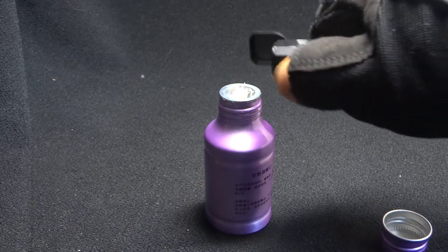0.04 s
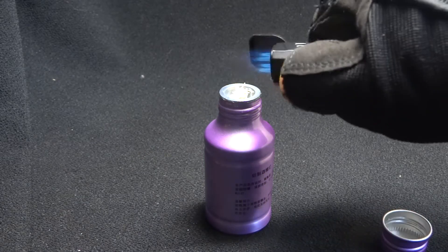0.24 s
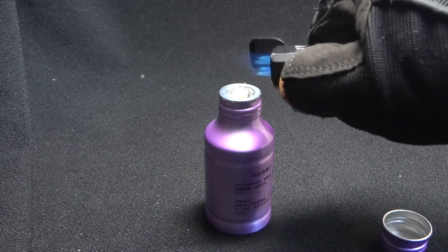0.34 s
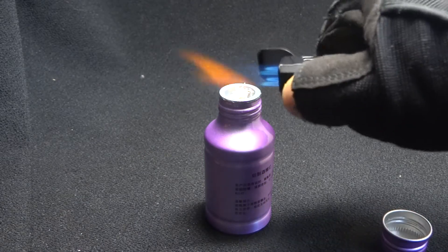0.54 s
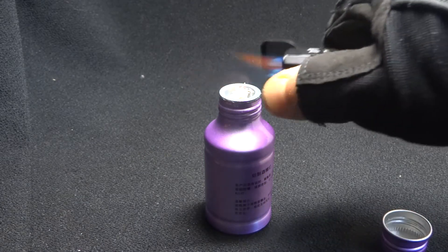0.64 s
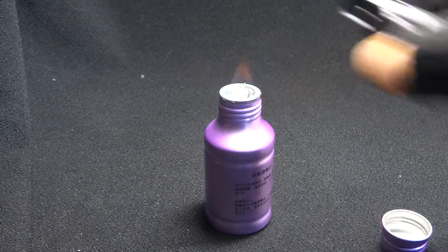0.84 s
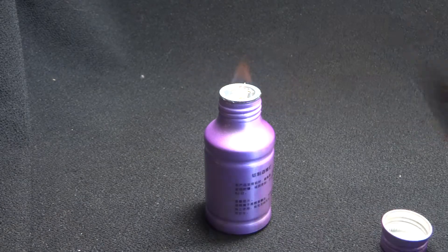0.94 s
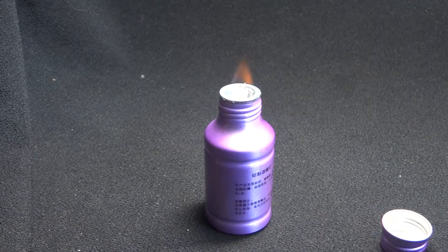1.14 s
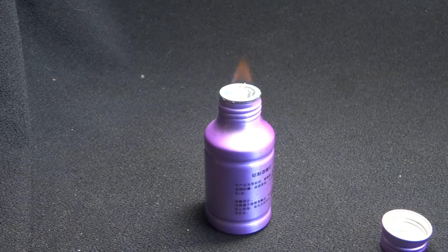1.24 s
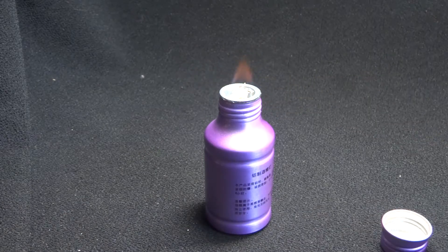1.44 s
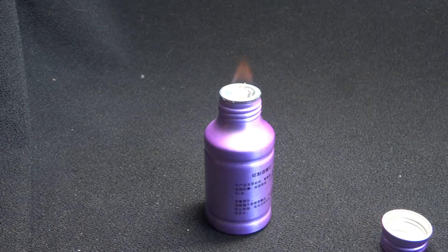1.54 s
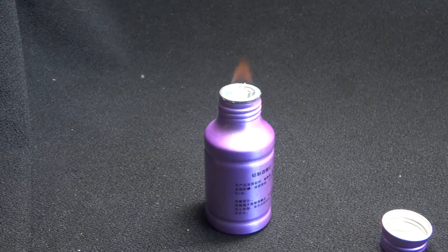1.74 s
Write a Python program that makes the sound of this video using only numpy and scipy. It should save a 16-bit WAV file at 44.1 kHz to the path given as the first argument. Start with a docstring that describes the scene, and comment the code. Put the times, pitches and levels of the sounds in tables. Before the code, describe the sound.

Sharp click and short rush of a jet lighter, followed by a dull knock.

```python
"""A jet lighter lights a spirit lamp on a cloth-covered table in a quiet room.
Gas hisses as the trigger goes down, the igniter's hammer snaps and rings the casing, the flame blows
for 0.4 s and the trigger clicks back. Then something, probably the lighter, is put down: hard contacts
tap, soft pushes ring the table with a dull knock. The hits echo briefly over a low room rumble."""
import sys
import numpy as np
from scipy import signal
from scipy.fft import rfft, irfft
from scipy.io import wavfile

SR = 44100
rng = np.random.default_rng(int(sys.argv[2]) if len(sys.argv) > 2 else 0)


def dump_mix(stems):
    """Bounce the given channels to the path in sys.argv[1] as a 16-bit WAV at rate SR."""
    frames = np.atleast_2d(stems).T  # one column per channel
    limited = np.clip(frames, -1, 1)  # hard clip at full scale
    pcm = np.round(limited * 32767).astype(np.int16)
    wavfile.write(sys.argv[1], SR, pcm)


N = 79380

# Room rumble spectrum (frequency [Hz], level [dB])
RUMBLE_SPECTRUM = [(15, -51.5), (25, -24), (59, 3.5), (141, -4.5), (311, 2.5), (344, 2), (518, -6),
                   (559, -5), (1260, -12.5), (1670, -13), (1900, -15), (4400, -22), (11000, -26),
                   (14300, -59), (22000, -120)]
# Reverb decay (frequency [Hz], T60 [s])
TAIL_T60 = [(100, 0.11), (400, .33), (2000, 0.23), (5000, 0.28), (8000, 0.23), (11000, 0.11)]
# Reverb spectrum (frequency [Hz], gain [dB])
TAIL_SPECTRUM = [(100, -6.5), (500, 0.5), (2000, 1), (5000, -2.5), (8000, -1.5), (11000, -2.5)]
# Early reflections (delay [s], gain [dB])
REFLECTIONS = [(.0042, -16.5), (.0078, -14.5), (.0095, -32), (0.016, -33.5)]

# Blows of hand and lighter (time [s], level [dB], push width [s], deep mode gain [dB])
PUSHES = [(0.2058, -35.5, 0.00042, -0.5), (0.2075, -37.5, 0.0021, 10), (0.247, -48, .0008, -22),
          (0.5419, -40, 0.00052, -36), (0.5447, -37.5, 0.0006, -42.5), (1.2837, -37, .0005, -4),
          (1.2923, -29, 0.0021, -7), (1.2995, -23, 0.00091, -1.5), (1.3025, -25.5, 0.00033, -3),
          (1.3325, -39, 0.0016, -15)]
# Table modes (frequency [Hz])
TABLE_MODES_HZ = [237, 287, 340, 408, 460, 510, 607, 730]
# Ring per table mode (level [dB], T60 [s])
TABLE_DECAYS = [(-16.5, .22), (-30.5, .12), (-24, .14), (-18, 0.12), (-15.5, .09), (-18.5, .14), (-30, 0.3),
                (-27.5, 0.16)]
# Low modes of table and room (frequency [Hz], level [dB], T60 [s])
DEEP_MODES = [(50, -29, .3), (99.4, -23, 0.41), (143, -12.5, 0.57)]
# Thump filter (frequency [Hz], gain [dB])
THUMP_SPECTRUM = [(25, -31), (50, -5), (110, 1), (400, 4.5), (1000, -4)]
# Put-down contacts (time [s], levels at 600 Hz, 1.2 kHz, 2 kHz, 8 kHz [dB], decay [s])
CONTACTS = [(1.2399, -2.5, -3, -16, -22.5, 0.0084), (1.2837, -1.5, -15.5, -30.5, -44, 0.0039),
            (1.2911, 7.5, -12.5, -2, -10, 0.0048), (1.332, -7.5, -30, -26.5, -33.5, 0.0024),
            (1.3444, -12, -31.5, -22.5, -34, 0.0096)]
# Tap low end (frequency [Hz], level re 600 Hz [dB])
TAP_LOW_END = [(30, -42), (150, -2.5), (330, -1.5)]
# Woody ring of a tap (frequency [Hz], level [dB], T60 [s])
WOOD_MODES = [(710, -9, .025), (1116, -8, 0.039), (1380, -8, 0.025), (2082, -0.5, 0.018), (3054, -1, 0.01),
              (3945, 1.5, 0.028), (4380, -6, 0.022), (5730, 0, 0.014), (7500, 8, 0.016)]

# Trigger and casing clicks
# (time [s], levels at 2, 4, 9 kHz [dB], decay [s], struck part pitch [Hz], part level [dB])
CLICK_EVENTS = [(.0385, -33, -31, -40.5, 0.004, 3460, -1), (.0848, -5.5, -9.5, -8.5, 0.0015, 2618, -27),
                (.1208, -16, -34, -27.5, .002, 3540, 1), (.4338, -23.5, -19.5, -24.5, 0.0043, 3630, -2),
                (.5946, -6, -13.5, -2.5, 0.0039, 3720, 2), (.6178, -24, -30, -21, 0.0033, 4970, 0),
                (.637, -32, -34, -39, 0.0019, 4900, -10), (.7195, -26.5, -47, -57, .002, 2390, -6),
                (1.016, -38.5, -30.5, -40.5, 0.0039, 4703, -13.5), (1.037, -37, -41, -43, .003, 3930, -2)]
# Click low end (frequency [Hz], level re 2 kHz [dB])
CLICK_LOW_END = [(60, -16.5), (350, -13.5), (800, -22.5), (1350, -18)]
# Trigger ring (frequency [Hz], level [dB], T60 [s])
TRIGGER_MODES = [(1890, -11, .025), (2140, -5, .03), (2300, -3, .025), (2700, -2, .012), (3330, -1, .016),
                 (3850, 1, .016), (4930, -2, .016), (6250, 1, .014), (7450, -4, .016), (8760, -3, .016),
                 (9230, -3, .018), (10150, -2, .016)]
# Hammer impact spectrum (frequency [Hz], gain [dB])
SNAP_SPECTRUM = [(60, -36.5), (250, -30.5), (450, -19.5), (850, -32.5), (1400, -18), (1850, -0.5),
                 (2350, 0), (2900, -12.5), (3700, 1), (4800, -6.5), (5600, -4.5), (8000, 1.5), (9000, -3),
                 (9700, -2), (11000, -7.5)]
# Casing ring (frequency [Hz], level [dB], T60 [s])
CASING_MODES = [(1915, -1, .035), (2140, -1, .04), (2290, 1, .03), (2600, -9, .012), (3300, -9, .015),
                (3615, -3, .022), (3880, -4, .022), (4400, -8, .012), (5460, -5, .02), (5615, -6, .02),
                (6365, -3, .022), (6670, -3, .02), (7350, -2, .025), (8010, 2, .022), (8110, 0, .02),
                (8650, -7, .03), (8780, -7, .03), (9545, -3, .02), (9855, -2, .025)]
# Unlit gas spectrum (frequency [Hz], level [dB])
GAS_SPECTRUM = [(200, -32.5), (1200, -15), (2300, -5), (3500, -6), (4500, -9.5), (6500, -11.5), (7700, 0),
                (8250, 4), (8700, -1.5), (10500, 0), (11200, -2)]
# Unlit gas envelope (time [s], level [dB])
GAS_ENVELOPE = [(0, -59.5), (.07, -61), (.15, -66.5), (.2, -65.5)]
# Flame spectrum (frequency [Hz], level [dB])
FLAME_SPECTRUM = [(88, -35.5), (150, -8.5), (375, -0.5), (491, -1.5), (756, -10.5), (990, 2.5), (1180, -8),
                  (1550, -6.5), (2070, 1), (2810, -8.5), (3610, -8.5), (4170, -15.5), (4730, -11.5),
                  (5560, -11), (6530, -22.5), (7020, -19), (9360, -17), (10200, -13.5), (11000, -16.5),
                  (14300, -48), (22000, -120)]
# Flame dulling, valve shut (frequency [Hz], gain [dB])
DULLING = [(2000, 2), (3500, -9.5), (6000, -16.5)]

SNAP_S, VALVE_SHUT_S, FLAME_OFF_S = .1997, .59, .644
HIT_SAMPLES = 4096


def amp(db):
    """Decibels to gain."""
    return 10 ** (np.asarray(db) / 20)


def lookup(points, hz):
    """Interpolate on a log-frequency axis."""
    knots_hz, values = np.transpose(points)
    return np.interp(np.log(hz + 1), np.log(knots_hz + 1), values)


def unit(x):
    """Scale to energy 1."""
    return x / np.sqrt(np.sum(x ** 2) + 1e-20)


def add(mix, at_s, sound):
    """Mix in place."""
    part = mix[round(at_s * SR):][:len(sound)]
    part += sound[:len(part)]


def colour(x, spectrum, size=4096):
    """Minimum-phase filter."""
    log_gain = np.log(amp(lookup(spectrum, abs(np.fft.fftfreq(size, 1 / SR)))))
    impulse = np.fft.ifft(np.exp(np.conj(signal.hilbert(log_gain)))).real
    return signal.fftconvolve(x, impulse[:size // 2])[:len(x)]


def ring(modes, t):
    """Damped sines of alternating sign."""
    return sum((-1) ** k * amp(db - 60 * t / t60_s) * np.sin(2 * np.pi * hz * t)
               for k, (hz, db, t60_s) in enumerate(modes))


def burst(rise_s, decay_s):
    """Contact chatter: flat spectrum, energy 1."""
    t = np.arange(HIT_SAMPLES) / SR
    envelope = (1 - np.exp(-t / rise_s)) * np.exp(-t / decay_s)
    noise = rng.standard_normal(HIT_SAMPLES)
    for _ in range(3):
        bins = rfft(noise * envelope)
        whitened = irfft(bins / (abs(bins) + 1e-12))
        noise = whitened * envelope / (envelope ** 2 + envelope.max() ** 2 / 20)
    return unit(noise * envelope)


def hiss(spectrum, width=.17):
    """Steady, narrow stereo noise, mid RMS 1."""
    gain = amp(lookup(spectrum, np.fft.rfftfreq(N, 1 / SR)))
    mid, side = irfft(rfft(rng.standard_normal((2, N))) * gain, N)
    return np.array([mid + width * side, mid - width * side]) / mid.std()


def room_rumble(level_db=-64.5):
    """Steady low noise of the room."""
    return amp(level_db) * hiss(RUMBLE_SPECTRUM)


def room_reverb(x, tail_db=-12, onset_s=.002, width=.45):
    """Early reflections and a short, narrow tail."""
    hz, frame_s, bins = signal.stft(rng.standard_normal((2, SR)), SR, nperseg=256)
    decay = amp(-60 * frame_s / lookup(TAIL_T60, hz)[:, None])
    tails = signal.istft(bins * decay, SR, nperseg=256)[1]
    tails *= np.clip(np.arange(tails.shape[1]) / SR / onset_s, 0, 1)
    mid, side = [amp(tail_db) * colour(unit(tail), TAIL_SPECTRUM) for tail in tails]
    side = colour(side, [(120, -13.5), (600, 1.5)])
    for delay_s, db in REFLECTIONS:
        add(mid, delay_s, amp([db]))
    response = np.array([mid + width * side, mid - width * side])
    return signal.fftconvolve(x[None], response, axes=1)[:, :N]


def table_thumps(lead_s=.003):
    """Soft Gaussian pushes ring the table and the deep modes."""
    out, t = np.zeros(N), np.arange(SR // 2) / SR
    table = ring([(hz, *mode) for hz, mode in zip(TABLE_MODES_HZ, TABLE_DECAYS)], t)
    for at_s, db, width_s, deep_db in PUSHES:
        push = np.exp(-((t - lead_s) / width_s) ** 2 / 2)
        response = table + amp(deep_db) * ring(DEEP_MODES, t)
        body = signal.fftconvolve(push / push.sum(), response)[:len(t)]
        add(out, at_s - lead_s, amp(db) * (push + body))
    return colour(out, THUMP_SPECTRUM)


def table_taps(rise_s=.00034, ring_db=-8):
    """Hard contacts with a short, woody ring."""
    out, t = np.zeros(N), np.arange(HIT_SAMPLES) / SR
    wood = amp(ring_db) * unit(ring(WOOD_MODES, t))
    for at_s, low_db, body_db, mid_db, high_db, decay_s in CONTACTS:
        spectrum = [(hz, db + low_db) for hz, db in TAP_LOW_END]
        spectrum += [(600, low_db), (1200, body_db), (1600, mid_db - 4.5), (2000, mid_db),
                     (4000, mid_db - .5), (6200, high_db - 1.5), (8000, high_db)]
        add(out, at_s, colour(unit(burst(rise_s, decay_s) + wood), spectrum))
    return out


def trigger_clicks(rise_s=.0001, ring_db=-4, part_t60_s=.011):
    """Each contact rings the trigger and the struck part."""
    out, t = np.zeros(N), np.arange(HIT_SAMPLES) / SR
    trigger = amp(ring_db) * unit(ring(TRIGGER_MODES, t))
    for at_s, low_db, mid_db, high_db, decay_s, part_hz, part_db in CLICK_EVENTS:
        spectrum = [(hz, db + low_db) for hz, db in CLICK_LOW_END]
        spectrum += [(2000, low_db), (4000, mid_db), (9000, high_db)]
        part = amp(part_db) * unit(amp(-60 * t / part_t60_s) * np.cos(2 * np.pi * part_hz * t))
        add(out, at_s, colour(unit(burst(rise_s, decay_s) + trigger + part), spectrum))
    return out


def igniter_snap(impact_db=12, ring_db=1, rise_s=.0005, decay_s=.0013):
    """The hammer strikes and rings the casing."""
    out, t = np.zeros(N), np.arange(HIT_SAMPLES) / SR
    impact = colour(burst(rise_s, decay_s), SNAP_SPECTRUM)
    casing = colour(unit(ring(CASING_MODES, t)), [(900, -10.5), (1800, -1.5)])
    add(out, SNAP_S, amp(impact_db) * impact)
    add(out, SNAP_S + rise_s, amp(ring_db) * casing)
    return out


def unlit_gas(fade_s=.044):
    """Escaping gas hisses thinly, fading after the snap."""
    t = np.arange(N) / SR
    level_db = np.interp(t, *np.transpose(GAS_ENVELOPE))
    fade = np.exp(-np.maximum(t - SNAP_S, 0) / fade_s)
    return fade * amp(level_db) * hiss(GAS_SPECTRUM)


def jet_flame(level_db=-57, ramp_s=.03, fade_s=.031):
    """Burning gas rushes from the snap on; dulls and dies once the valve shuts."""
    t = np.arange(N) / SR
    lit, shut = [np.clip((t - at_s) / ramp_s, 0, 1) for at_s in (SNAP_S, VALVE_SHUT_S)]
    flow = np.exp(-np.maximum(t - FLAME_OFF_S, 0) / fade_s)
    rush = hiss(FLAME_SPECTRUM)
    dulled = np.array([colour(channel, DULLING) for channel in rush])
    return lit * flow * amp(level_db) * ((1 - shut) * rush + shut * dulled)


def scene(pan_db=.44):
    """Lighter and table slightly left, over the rumble; reverb on the hits only."""
    hits = trigger_clicks() + igniter_snap() + table_thumps() + table_taps()
    foreground = hits + room_reverb(hits) + unlit_gas() + jet_flame()
    return foreground * amp([[pan_db], [-pan_db]]) + room_rumble()


def record(dry):
    """Steep low-pass."""
    cutoff_hz = 11120
    lowpass = signal.firwin(511, cutoff_hz, window=("kaiser", 8), fs=SR)
    return signal.oaconvolve(dry, lowpass[None], "same")


dry = scene()
out = record(dry)
dump_mix(out)
```